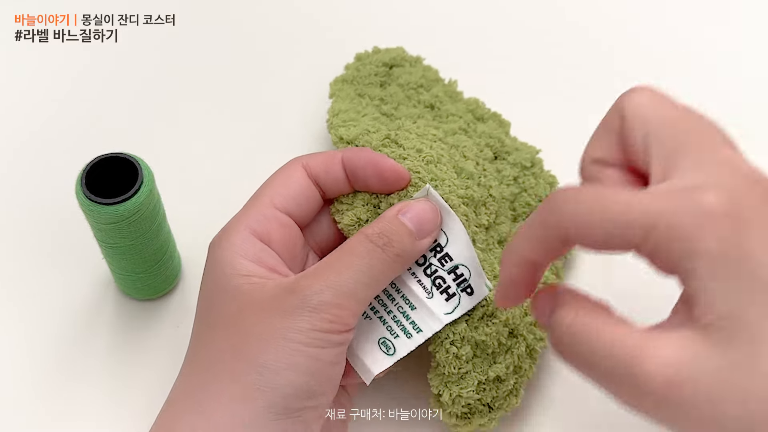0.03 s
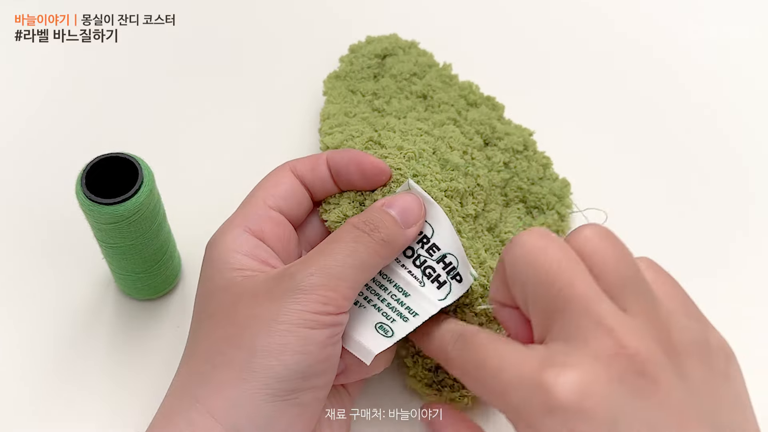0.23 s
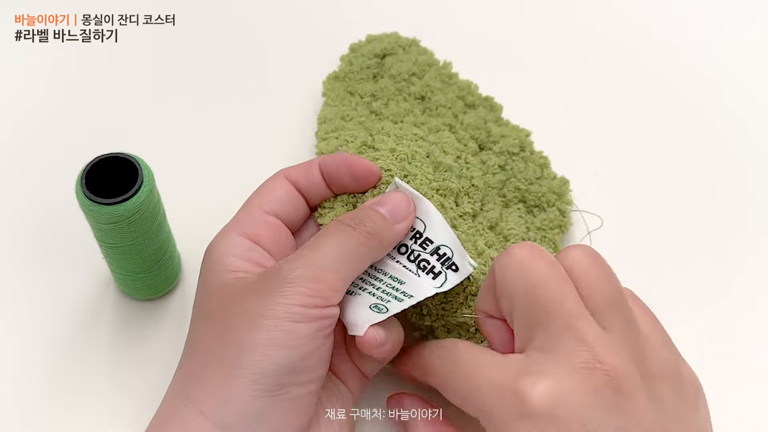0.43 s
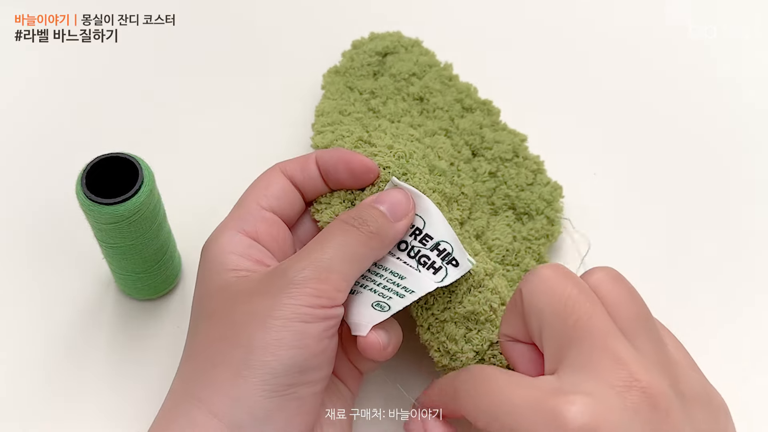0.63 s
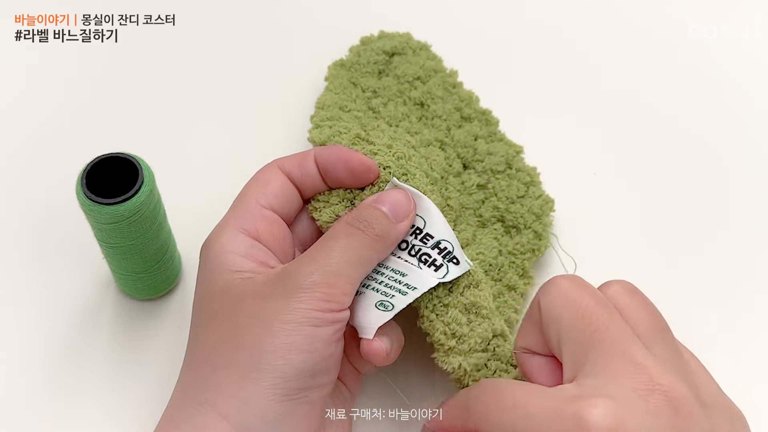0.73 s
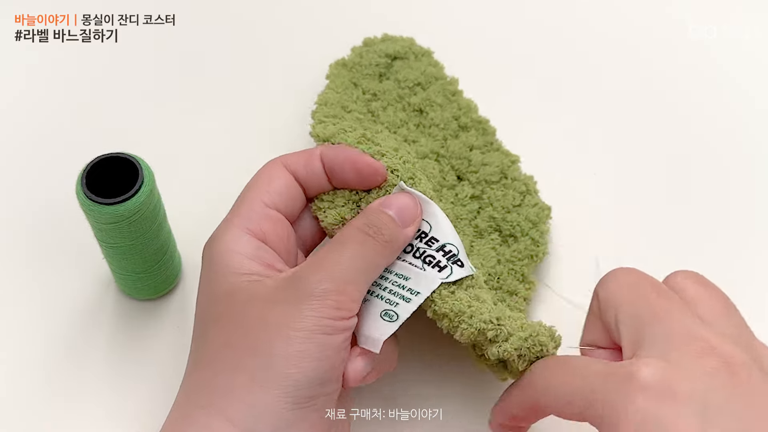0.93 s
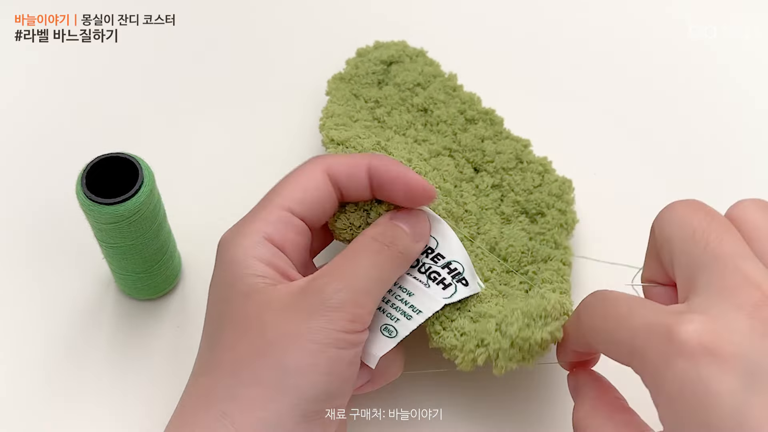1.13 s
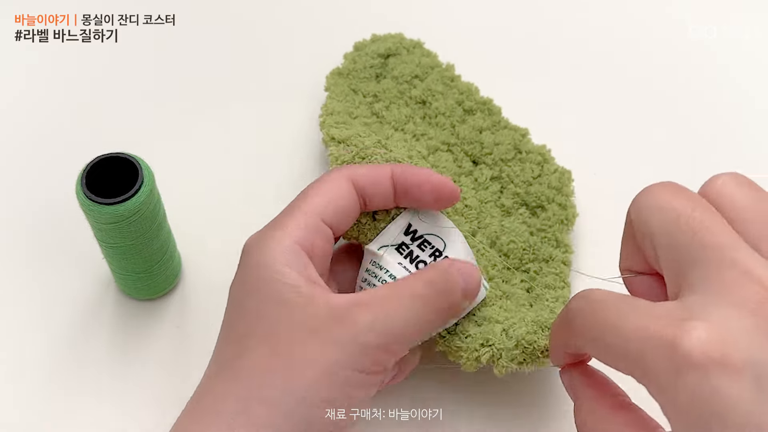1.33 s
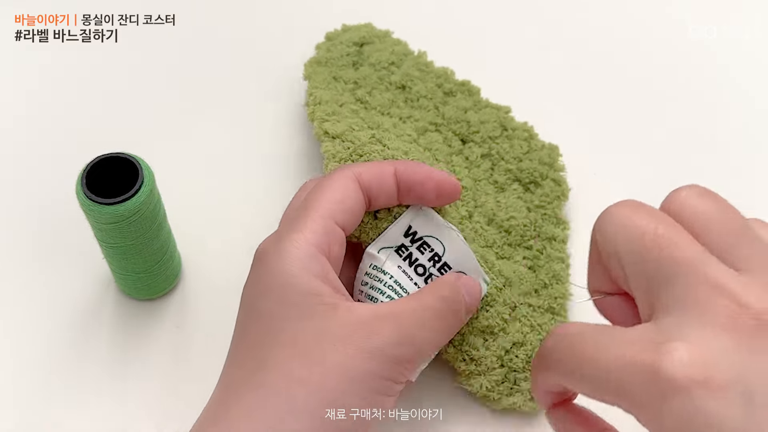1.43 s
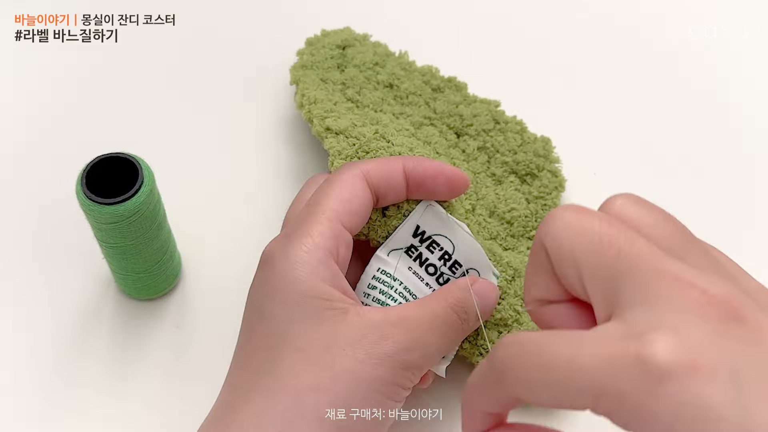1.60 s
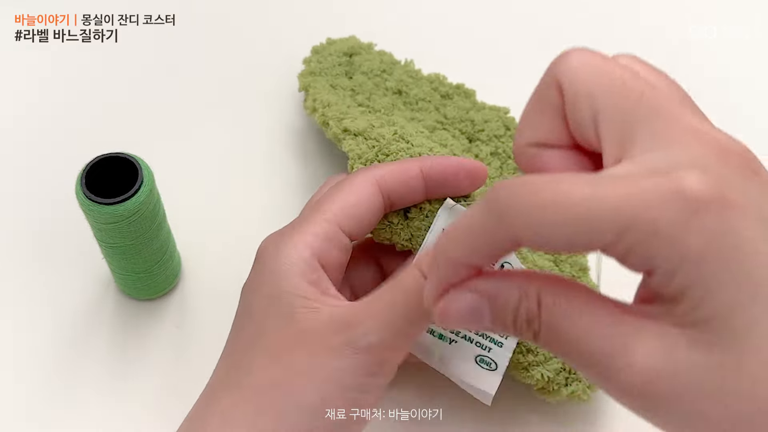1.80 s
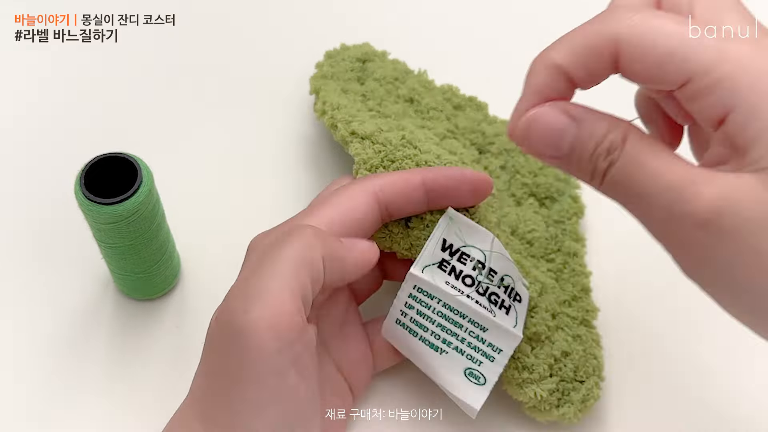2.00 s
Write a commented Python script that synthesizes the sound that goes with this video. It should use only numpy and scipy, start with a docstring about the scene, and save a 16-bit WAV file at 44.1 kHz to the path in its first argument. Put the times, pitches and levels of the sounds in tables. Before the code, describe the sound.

Thread is drawn through a cloth label on a soft knitted coaster: a faint hiss, a quick double rasp with snaps, light rustles and ticks, then another snap; close microphone, quiet room.

```python
"""In a quiet room, close to the microphone, a cloth label is sewn by hand onto a soft knitted coaster.
Dense random slips make the thread hiss as it slides; coarser clumps rasp and ring the label, and snags snap.
Filtered grains and noise make the finger brushes, scuffs and dull rubs; needle and nails tick as short bursts.
A wavering low sine is the hand that nudges the table at the start. Soft air noise, echoes and a faint tail
place it all in the room."""
import sys
import numpy as np
from scipy import signal
from scipy.fft import rfft, irfft
from scipy.io import wavfile

SR = 44100
rng = np.random.default_rng(int(sys.argv[2]) if len(sys.argv) > 2 else 0)


def digitize_waveform(pressure):
    """Quantize a signal to 16-bit integers and store it at the path in sys.argv[1].

    Rows of a 2-D input are taken as channels; values are limited to [-1, 1].
    """
    field = np.atleast_2d(pressure).T
    bounded = np.clip(field, -1, 1)
    quanta = np.round(bounded * 32767).astype(np.int16)
    wavfile.write(sys.argv[1], SR, quanta)


N = 90625
TIME = np.arange(N) / SR  # seconds

# Levels are dB re full scale. Colours are relative: each filter is scaled to unit energy.
# In strokes, rise and fall are times per 20 dB; full level starts at t and lasts for the hold.
# Treble is the tilt between the bands above and below TREBLE_HZ, at equal energy.
TREBLE_HZ = 3060

# Room air and microphone hiss: f/Hz, density/dB
AIR_COLOUR = [(20, 6.5), (36, 16), (55, 0), (85, 9), (115, -4.5), (145, -5.5), (190, 2), (310, 3.5),
              (420, -1), (530, 0.5), (700, -3), (1500, -5), (3000, -8), (10000, -15), (15500, -19.5)]
AIR_DB = -65
# Noise that differs between the channels: f/Hz, density/dB
SIDE_HISS_COLOUR = [(45, 40.5), (120, 16), (400, 4), (2000, -9), (7000, -11), (11000, 6), (15000, 1)]
SIDE_HISS_DB = -78.5
# Steady offset of each channel: one row per channel, offset/full scale
CHANNEL_OFFSET = [
    [-0.033],
    [-0.039],
]
CUTOFF_HZ = 15800

# Echoes from the table and things standing near: delay/s, level relative to the direct sound/dB
NEAR_ECHOES = [(.0013, -40), (.0028, -26), (.0046, -21), (.0071, -14)]
ROOM_T60_S, ROOM_TAIL_DB = 0.31, -27

# A hand judders over the table: t/s, rise/s, hold/s, fall/s, level before wavering/dB, centre f/Hz
TABLE_NUDGES = [(0.008, 0.029, 0.073, 0.14, -59.5, 167.5), (0.08, 0.045, 0.015, 0.127, -63, 104.7)]
# RMS pitch unsteadiness as a share, its highest rate, RMS level unsteadiness
NUDGE_WAVER, NUDGE_WAVER_HZ, NUDGE_ROUGH_DB = 0.087, 30.5, 2.5

# The hands shift on the coaster with a dull rub: t/s, rise/s, hold/s, fall/s, level/dB
HAND_SHIFTS = [(1.364, 0.085, 0.054, 0.45, -69.5), (1.735, 0.04, 0.038, 0.079, -71),
               (1.94, 0.076, 0.02, 0.098, -68)]
# Rub of skin on thick yarn: f/Hz, level/dB
HAND_SHIFT_COLOUR = [(60, -24), (300, 1), (560, 6.5), (900, -1), (2000, -27), (8000, -62)]

# Fingers brush the yarn: t/s, rise/s, hold/s, fall/s, level/dB, treble/dB
YARN_BRUSHES = [(0.434, 0.039, 0.13, 0.078, -68.5, -17), (0.662, 0.11, 0.052, 0.25, -62, 14),
                (0.777, 0.076, 0.11, 0.084, -66, 3.5), (1.167, 0.06, 0.013, 0.066, -61.5, 16),
                (1.546, 0.013, 0.063, 0.1, -68.5, -14), (1.698, 0.08, 0.072, 0.038, -66, 0)]
# Rustle of the yarn: f/Hz, level/dB
YARN_COLOUR = [(200, -11.5), (450, -6), (900, 1), (1450, 4), (1800, 2), (2450, 2), (2950, -1), (3500, 1.5),
               (7500, -6), (11000, -13), (15500, -19.5)]
# A fingertip scuffs the stiff label: t/s, rise/s, hold/s, fall/s, level/dB, treble/dB
LABEL_SCUFFS = [(1.2635, 0.002, 0.022, 0.023, -60, 0.5), (1.343, .02, 0.018, 0.14, -66.5, -5),
                (1.898, .03, 0.032, 0.023, -65.5, -9)]
# Rustle of the label: f/Hz, level/dB
LABEL_COLOUR = [(300, -15), (1000, -16.5), (1400, 4), (1750, 2), (2100, 3.5), (2600, 5.5), (2950, -10),
                (3350, 4), (3900, -7.5), (7000, -6), (11000, -16.5), (15500, -22)]
RUB_GRAINS_PER_S, RUB_SPREAD_DB = 7000, 0

# Needle and nails: t/s, level before ring and contact/dB, decay per 20 dB/s, treble/dB, resonance f/Hz,
# bass edge f/Hz, first contact against half the scuff energy before its own gain/dB
NEEDLE_TICKS = [(0.8899, -53, 0.0049, 6, 5600, 600, -4), (0.9223, -47, 0.0038, -13, 4500, 1340, 1),
                (0.9871, -59.5, 0.0044, -1, 945, 500, 5), (1.124, -56, 0.004, -11, 2620, 1780, 6),
                (1.405, -56.5, 0.0038, -12, 2200, 800, -3), (1.507, -54.5, 0.0082, 1, 3600, 1000, -17),
                (1.509, -49, 0.0054, -2, 2420, 550, -8), (1.9448, -54.5, 0.0063, 11, 3300, 600, 3),
                (1.9473, -50, 0.0087, -14, 850, 200, -4.5)]
# Contact of needle and nails: f/Hz, level/dB
NEEDLE_COLOUR = [(150, -5), (500, -1), (1000, -8.5), (1500, 1), (2500, 1), (3050, -4.5), (3900, -4),
                 (4700, -3.5), (5500, -7.5), (9000, -8), (15500, -24)]
TICK_SCUFF_DB = -1  # fibres that slip after the first contact
TICK_RING_HZ_WIDE, TICK_RING_DB = 466, 5.5

# The thread snags and snaps free: t/s, level before ring/dB, decay per 20 dB/s, resonance f/Hz
THREAD_SNAGS = [(0.3985, -51, 0.0033, 1530), (0.4135, -45, 0.0048, 1360), (1.7433, -48.5, 0.0034, 1870),
                (1.748, -41.5, 0.0033, 1870)]
# Flick of thread against label: f/Hz, level/dB
THREAD_SNAG_COLOUR = [(300, -18), (600, -4), (1100, 1.5), (1800, -2), (3000, -14.5), (4300, -4), (5300, 5),
                      (6800, 2.5), (8500, -14), (13000, -3.5), (15500, -12)]
SNAG_RELEASE_DB = -4.5  # the first jerk, against the flutter after it
SNAG_RING_HZ_WIDE, SNAG_RING_DB = 129, 12.5

# The thread drags through the label: t/s, rise/s, hold/s, fall/s, level/dB, label resonance f/Hz, treble/dB
THREAD_RASPS = [(0.3778, 0.0014, 0.0065, 0.014, -57, 2080, 4),
                (0.3967, 0.014, 0.0066, 0.033, -51.5, 1960, 10),
                (0.41, .006, 0.0093, 0.029, -50.5, 2080, 4.5),
                (1.743, 0.033, 0.0057, 0.013, -53.5, 1880, 4), (1.898, 0.02, 0.0081, 0.049, -56, 1640, 2.5)]
# Rasp of thread in the weave: f/Hz, level/dB
THREAD_RASP_COLOUR = [(200, -33.5), (550, 1), (720, -10), (880, 2.5), (1030, -4), (1350, 5), (1750, -5),
                      (2400, -1), (2850, -6), (3350, -3.5), (4200, -5), (5300, -8.5), (7200, -2.5),
                      (9500, -9), (13000, -17.5), (15500, -17)]
RASP_RING_HZ_WIDE, RASP_RING_DB = 146, 10
RASP_GRAINS_PER_S, RASP_SPREAD_DB = 7100, -1.5
# The twist of the thread catches unevenly in the weave: highest rate, RMS level swing
RASP_CATCHES_PER_S, RASP_CATCH_DB = 164, 2

# The thread slides: t/s, rise/s, hold/s, fall/s, level/dB, resonance f/Hz
THREAD_SLIDES = [(0.098, 0.11, 0.025, 0.26, -59, 4940), (1.713, 0.095, 0.19, 0.072, -63.5, 5030)]
# Hiss of the sliding thread: f/Hz, level/dB
THREAD_SLIDE_COLOUR = [(500, -27), (1100, -0.5), (1900, -2.5), (2800, 0.5), (3500, 4), (4200, -3.5),
                       (6300, -3), (8500, -1.5), (11000, -7), (15500, -12.5)]
SLIDE_RING_HZ_WIDE, SLIDE_RING_DB = 640, 10.5
SLIDE_GRAINS_PER_S, SLIDE_SPREAD_DB = 22000, 0


def from_db(db):
    """Decibels to gain."""
    return 10 ** (np.asarray(db) / 20)


def rms_one(x):
    """Scale to unit RMS level."""
    return x / np.sqrt(np.mean(x ** 2) + 1e-20)


def at_hz(points):
    """Read a colour, on a log frequency scale, at every bin of a double-length transform."""
    hz, db = np.transpose(points)
    bins_hz = np.arange(N + 1) * SR / (2 * N)
    return np.interp(np.log(bins_hz + 1), np.log(hz), db)  # + 1 avoids log(0)


def response(points):
    """Short minimum-phase impulse response with the given colour and unit energy."""
    cepstrum = irfft(np.log(from_db(at_hz(points))))
    # folding the cepstrum forward puts the energy as early as possible
    cepstrum[1:N] *= 2
    cepstrum[N + 1:] = 0
    h = irfft(np.exp(rfft(cepstrum)))[:SR // 10]
    return h / np.sqrt(np.sum(h ** 2))


def through(x, h):
    """Pass a sound through an impulse response."""
    return signal.fftconvolve(x, h)[:N]


def resonance(x, hz, width_hz):
    """One resonance with about unit gain at its peak."""
    r = np.exp(-np.pi * width_hz / SR)
    zeros = np.array([1, 0, -1]) * (1 - r * r) / 2
    poles = [1, -2 * r * np.cos(2 * np.pi * hz / SR), r * r]
    return signal.lfilter(zeros, poles, x)


def add_ring(x, hz, width_hz, ring_db):
    """Let a sound ring: a resonance lifts it by about ring_db at its centre."""
    return x + (from_db(ring_db) - 1) * resonance(x, hz, width_hz)


def shelf(x, treble_db):
    """Brighten or dull a sound by tilting treble against bass, keeping its energy."""
    low = signal.lfilter(*signal.butter(1, TREBLE_HZ, fs=SR), x + 1e-18)
    high = x - low
    tilted = low * from_db(-treble_db / 2) + high * from_db(treble_db / 2)
    return rms_one(tilted) * np.sqrt(np.mean(x ** 2))


def stroke(s, rise, hold, fall):
    """Swell, hold and fade; rise and fall each span 20 dB."""
    before = np.maximum(s - TIME, 0)
    after = np.maximum(TIME - s - hold, 0)
    return from_db(-20 * (before / rise + after / fall))


def fade_after(start, s, decay):
    """Fade by 20 dB per decay time, silent up to and at the start sample."""
    return from_db(-20 * np.abs(TIME - s) / decay) * (np.arange(N) > start)


def waver(hz):
    """Slow random drift with unit RMS spread."""
    noise = rng.standard_normal(2 * N)
    lowpass = signal.butter(2, hz, fs=SR, output="sos")
    return rms_one(signal.sosfilt(lowpass, noise)[N:])  # skip the filter's settling


def slips(per_s, spread_db):
    """Fibres catch and let go at random, as sparse impulses of either sign whose strength follows spread_db."""
    strengths = from_db(spread_db * np.minimum(rng.exponential(1, N), 4))
    signs = rng.choice([-1, 1], N)
    return rms_one(strengths * signs * (rng.random(N) < per_s / SR))


def room_air():
    """Room air and microphone hiss as steady coloured noise."""
    return from_db(AIR_DB) * through(rng.standard_normal(N), response(AIR_COLOUR))


def room(x):
    """A few close echoes and a faint, short, diffuse tail."""
    near = sum(from_db(db) * np.pad(x, (int(delay * SR), 0))[:N] for delay, db in NEAR_ECHOES)
    tail = rng.standard_normal(N) * from_db(-60 * TIME / ROOM_T60_S)
    tail = tail / np.sqrt(np.sum(tail ** 2))
    return near + from_db(ROOM_TAIL_DB) * through(x, tail)


def table_thrum():
    """Stick and slip of skin on the table gives a brief, unsteady low hum."""
    out = 0
    for s, rise, hold, fall, db, hz in TABLE_NUDGES:
        pitch_hz = hz * (1 + NUDGE_WAVER * waver(NUDGE_WAVER_HZ))
        hum = np.sqrt(2) * np.sin(2 * np.pi * np.cumsum(pitch_hz) / SR)
        level = from_db(db + NUDGE_ROUGH_DB * waver(NUDGE_WAVER_HZ))
        out = out + level * stroke(s, rise, hold, fall) * hum
    return out


def hand_shifts():
    """Skin rubs on thick yarn: noise with very little treble, swelling with each push."""
    push = sum(from_db(db) * stroke(s, rise, hold, fall) for s, rise, hold, fall, db in HAND_SHIFTS)
    return push * through(rng.standard_normal(N), response(HAND_SHIFT_COLOUR))


def finger_rubs(strokes, colour):
    """Soft grainy rustle of skin on yarn or cloth, each stroke with its own brightness."""
    out, body = 0, response(colour)
    for s, rise, hold, fall, db, treble_db in strokes:
        grains = slips(RUB_GRAINS_PER_S, RUB_SPREAD_DB)
        rustle = shelf(through(grains, body), treble_db)
        out = out + from_db(db) * stroke(s, rise, hold, fall) * rustle
    return out


def needle_ticks():
    """One small contact, then milliseconds of scuffing; each tick has its own ring and bass edge."""
    out, body = 0, response(NEEDLE_COLOUR)
    for s, db, decay, treble_db, hz, low_hz, contact_db in NEEDLE_TICKS:
        start = int(s * SR)
        fade = fade_after(start, s, decay)
        burst = from_db(TICK_SCUFF_DB) * fade * rng.choice([-1, 1], N)
        burst[start] = from_db(contact_db) * np.sqrt(np.sum(fade ** 2) / 2)
        tick = shelf(through(burst, body), treble_db)
        bass_cut = signal.butter(2, low_hz, "high", fs=SR, output="sos")
        tick = signal.sosfilt(bass_cut, tick)
        out = out + from_db(db) * add_ring(tick, hz, TICK_RING_HZ_WIDE, TICK_RING_DB)
    return out


def thread_snaps():
    """The taut thread lets go with one jerk and flicks the label, which flutters and rings."""
    out, body = 0, response(THREAD_SNAG_COLOUR)
    release = from_db(SNAG_RELEASE_DB)
    for s, db, decay, hz in THREAD_SNAGS:
        start = int(s * SR)
        fade = fade_after(start, s, decay)
        burst = fade * rng.choice([-1, 1], N)
        burst[start] = release * np.sqrt(np.sum(fade ** 2))
        burst = burst / np.sqrt(1 + release ** 2)  # the jerk adds no energy overall
        snap = through(burst, body)
        out = out + from_db(db) * add_ring(snap, hz, SNAG_RING_HZ_WIDE, SNAG_RING_DB)
    return out


def thread_rasps():
    """Coarser slips come in clumps and set the taut label ringing."""
    out, body = 0, response(THREAD_RASP_COLOUR)
    for s, rise, hold, fall, db, hz, treble_db in THREAD_RASPS:
        grains = slips(RASP_GRAINS_PER_S, RASP_SPREAD_DB)
        clumps = grains * from_db(RASP_CATCH_DB * waver(RASP_CATCHES_PER_S))
        rasp = shelf(through(clumps, body), treble_db)
        rasp = add_ring(rasp, hz, RASP_RING_HZ_WIDE, RASP_RING_DB)
        out = out + from_db(db) * stroke(s, rise, hold, fall) * rms_one(rasp)
    return out


def thread_slides():
    """Very fine slips merge into a hiss with a narrow resonance."""
    out, body = 0, response(THREAD_SLIDE_COLOUR)
    for s, rise, hold, fall, db, hz in THREAD_SLIDES:
        hiss = through(slips(SLIDE_GRAINS_PER_S, SLIDE_SPREAD_DB), body)
        hiss = add_ring(hiss, hz, SLIDE_RING_HZ_WIDE, SLIDE_RING_DB)
        out = out + from_db(db) * stroke(s, rise, hold, fall) * rms_one(hiss)
    return out


def scene():
    """All sounds sit in the middle; thread, fingertips and ticks also excite the room."""
    background = room_air() + table_thrum() + hand_shifts()
    rubs = finger_rubs(YARN_BRUSHES, YARN_COLOUR) + finger_rubs(LABEL_SCUFFS, LABEL_COLOUR)
    work = rubs + needle_ticks() + thread_snaps() + thread_rasps() + thread_slides()
    mono = background + work + room(work)
    return np.array([mono, mono])


def record(dry):
    """The channels differ by a trace of opposed noise and a steady offset; the top is cut."""
    side = from_db(SIDE_HISS_DB) * through(rng.standard_normal(N), response(SIDE_HISS_COLOUR))
    stereo = dry + np.array([side, -side])
    top_cut = signal.ellip(12, .1, 70, CUTOFF_HZ, fs=SR, output="sos")
    return signal.sosfilt(top_cut, stereo) + np.array(CHANNEL_OFFSET)


dry = scene()
out = record(dry)
digitize_waveform(out)
```